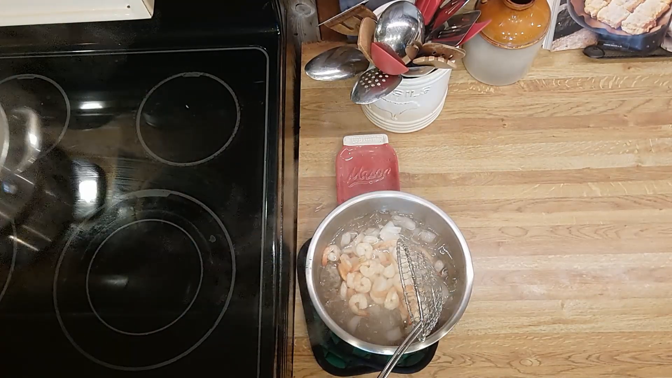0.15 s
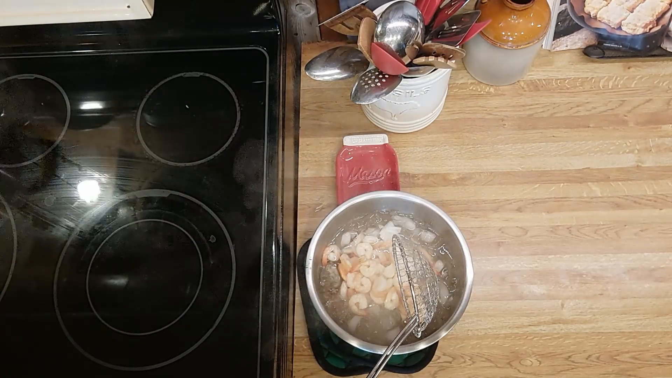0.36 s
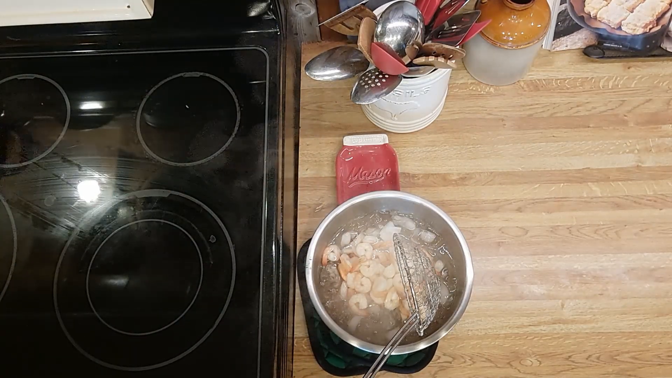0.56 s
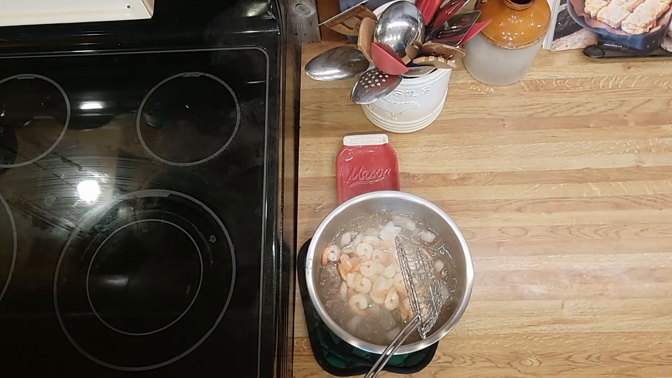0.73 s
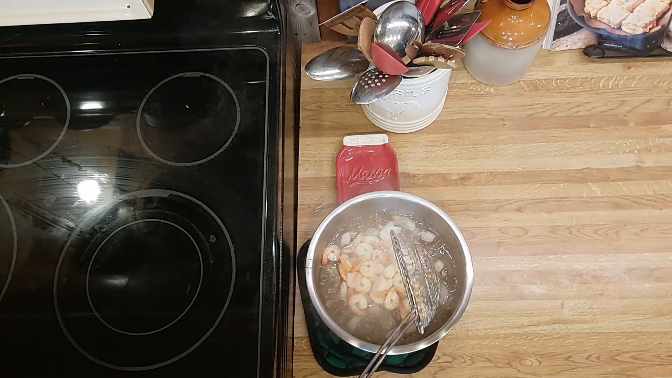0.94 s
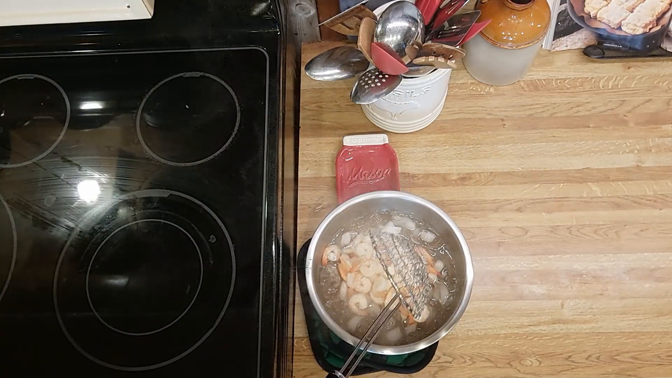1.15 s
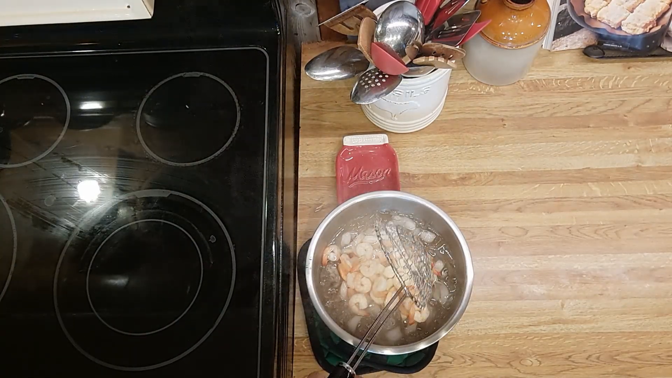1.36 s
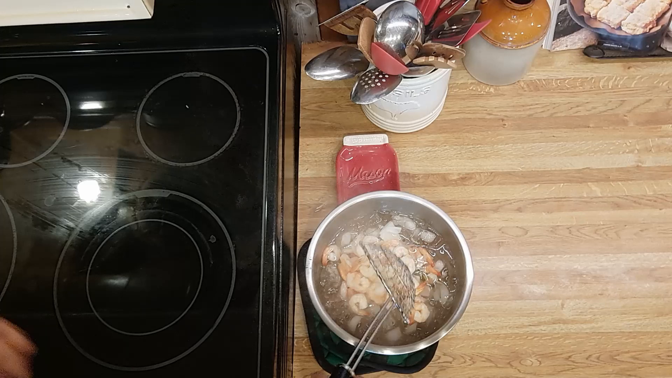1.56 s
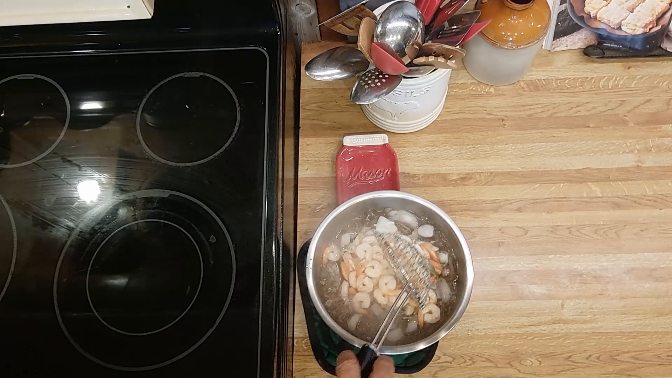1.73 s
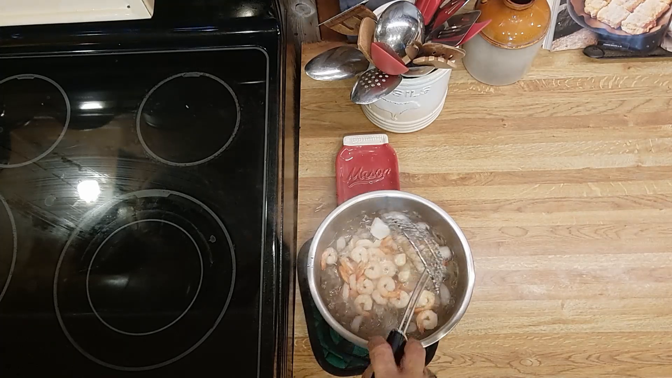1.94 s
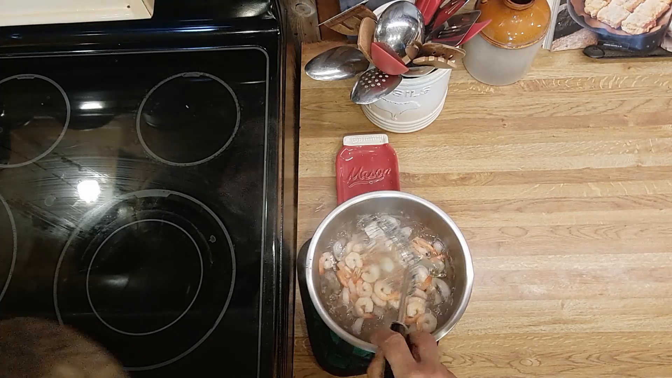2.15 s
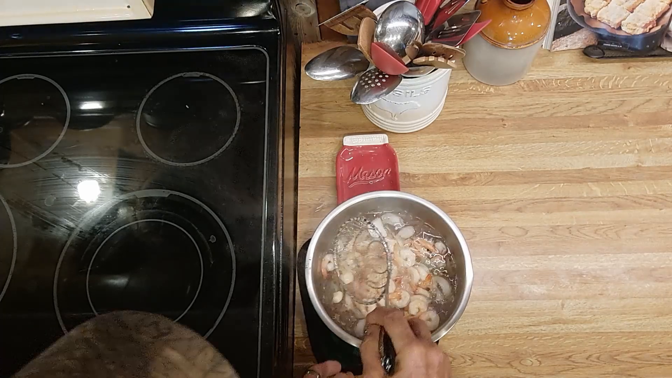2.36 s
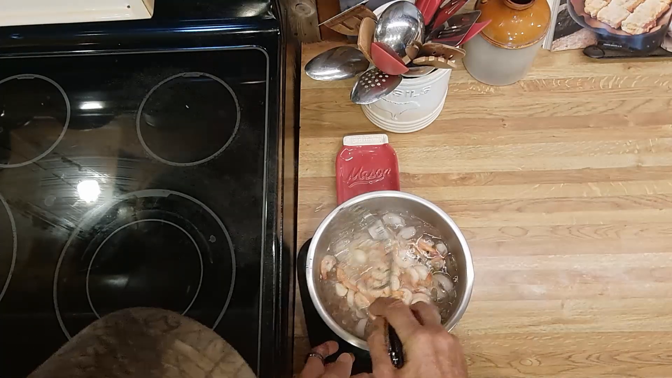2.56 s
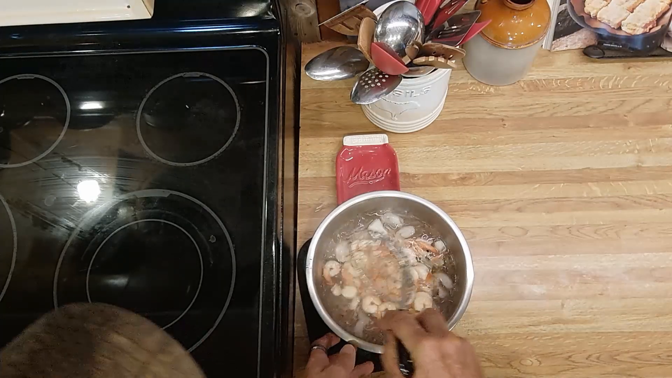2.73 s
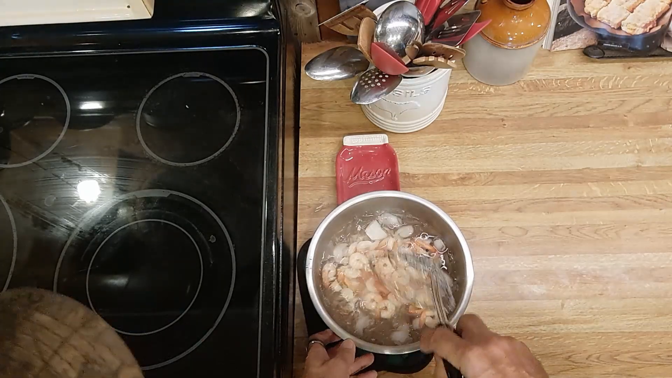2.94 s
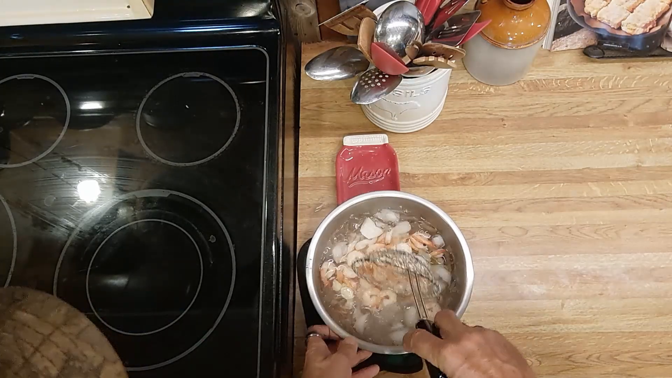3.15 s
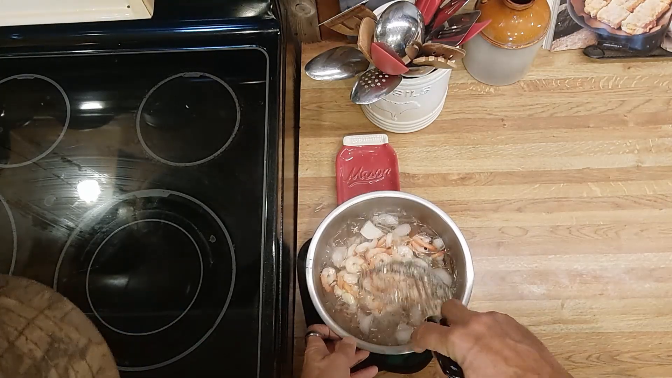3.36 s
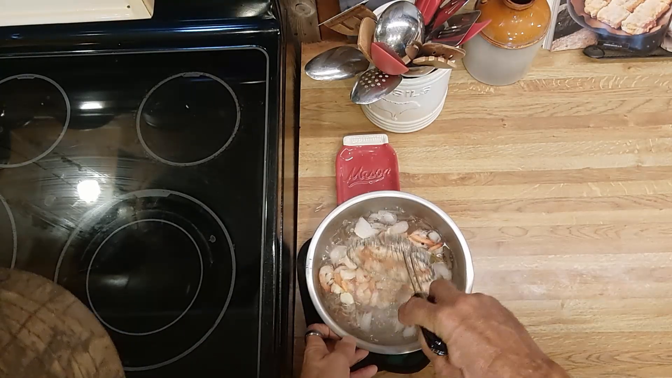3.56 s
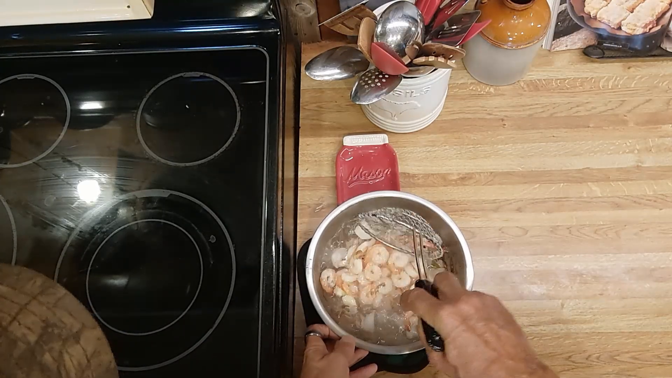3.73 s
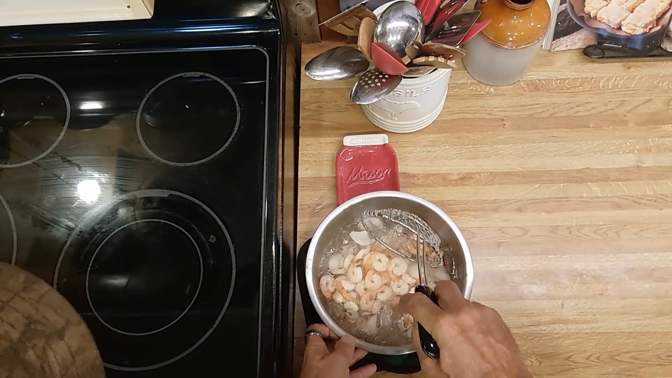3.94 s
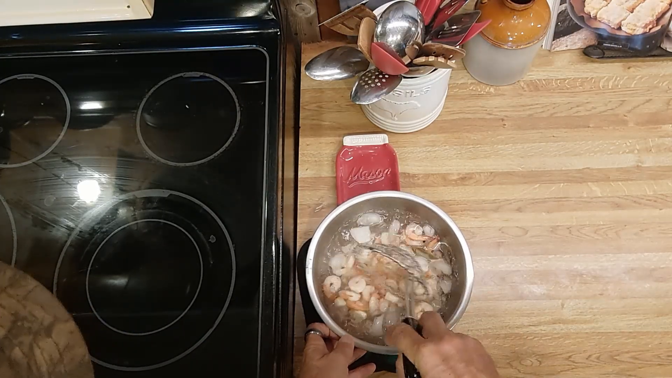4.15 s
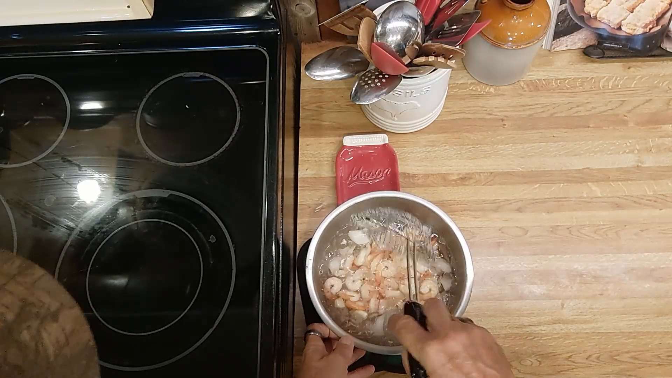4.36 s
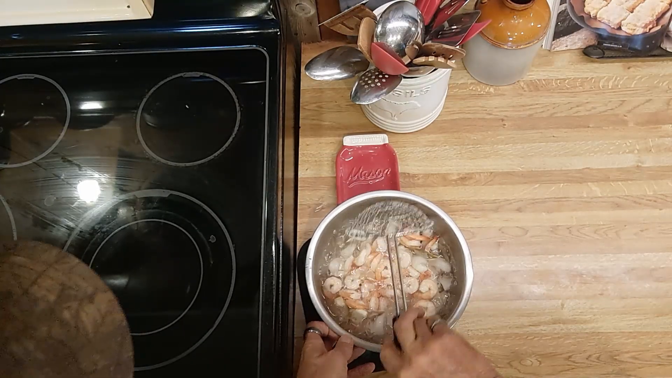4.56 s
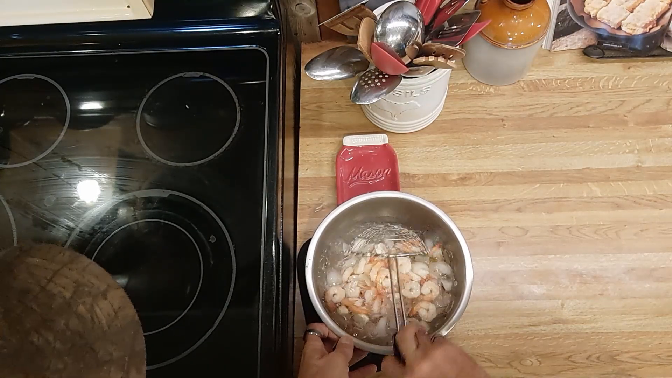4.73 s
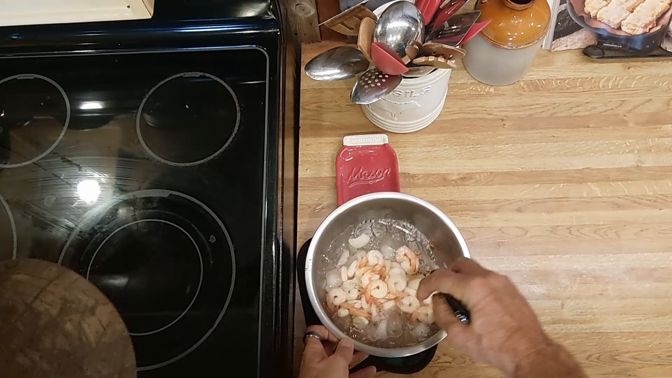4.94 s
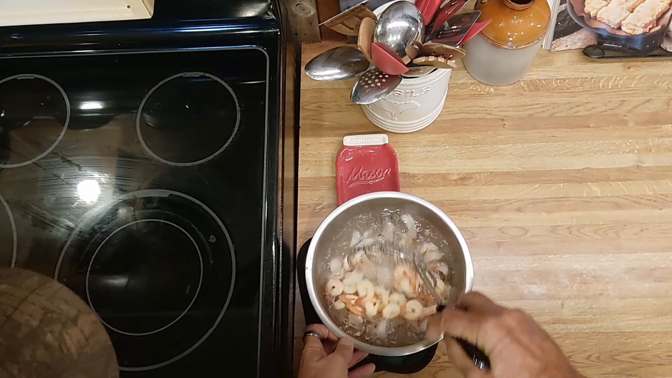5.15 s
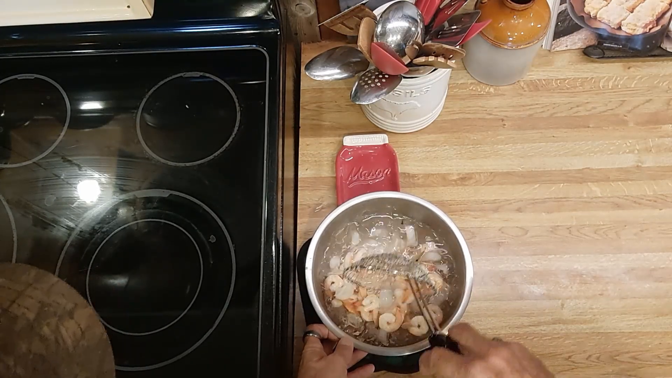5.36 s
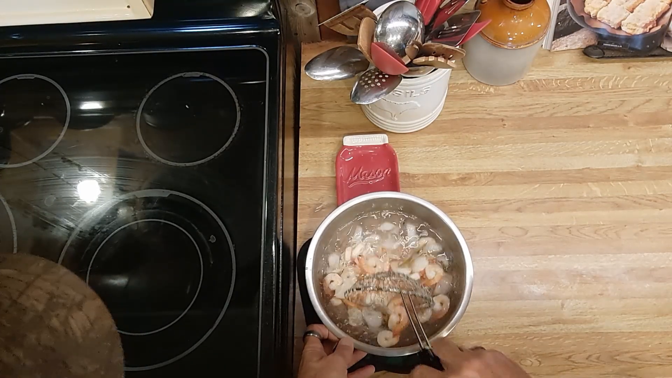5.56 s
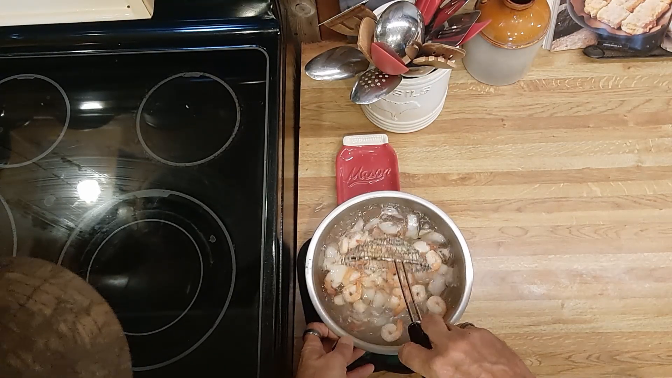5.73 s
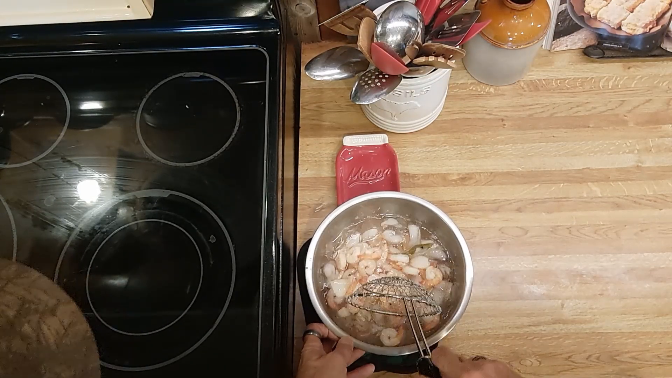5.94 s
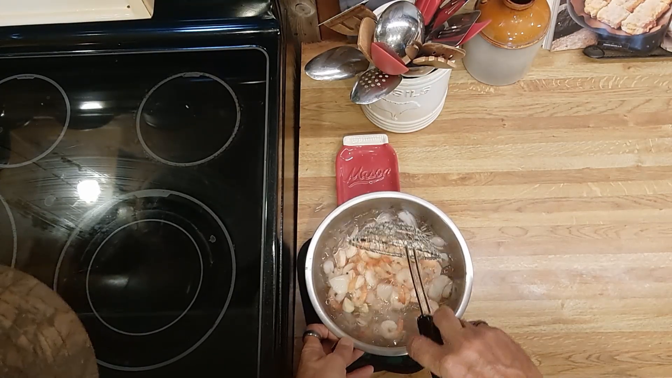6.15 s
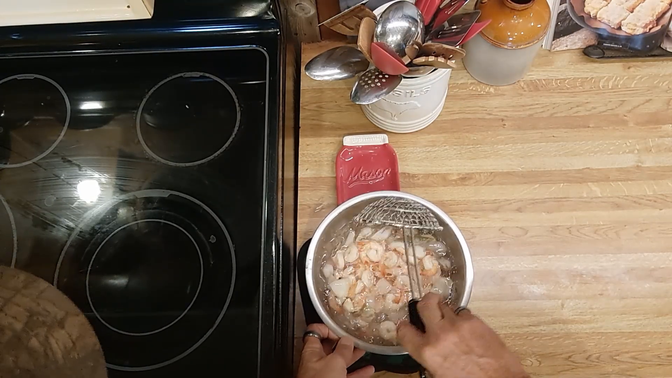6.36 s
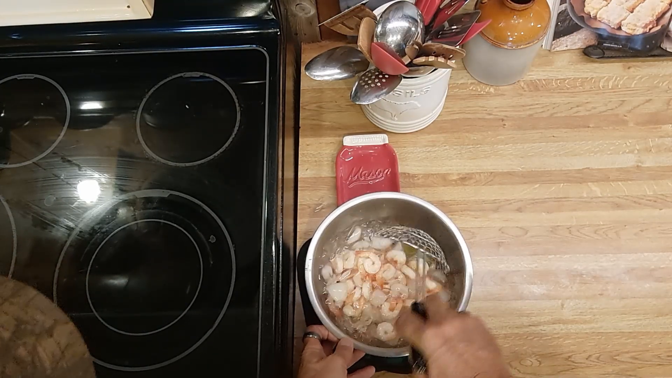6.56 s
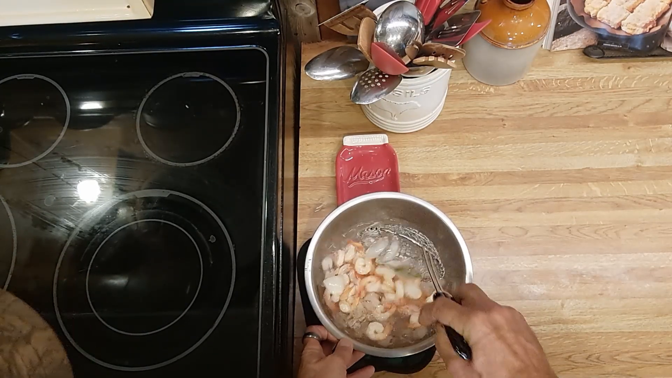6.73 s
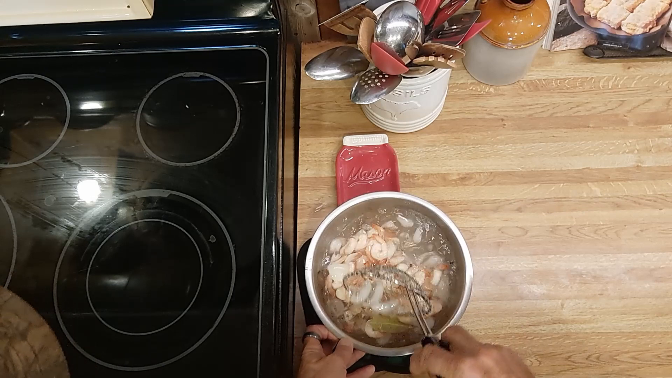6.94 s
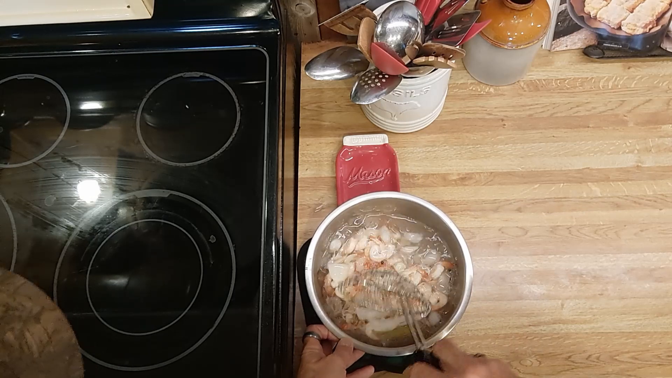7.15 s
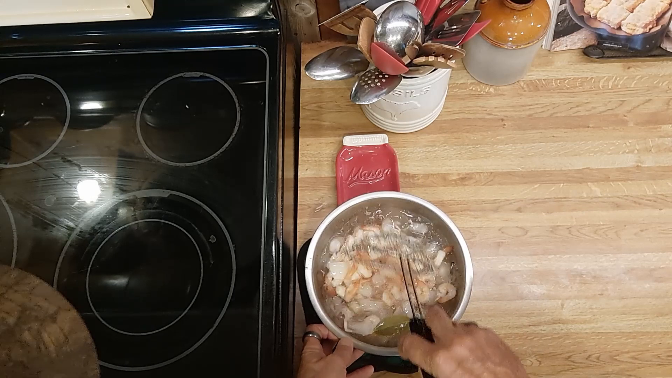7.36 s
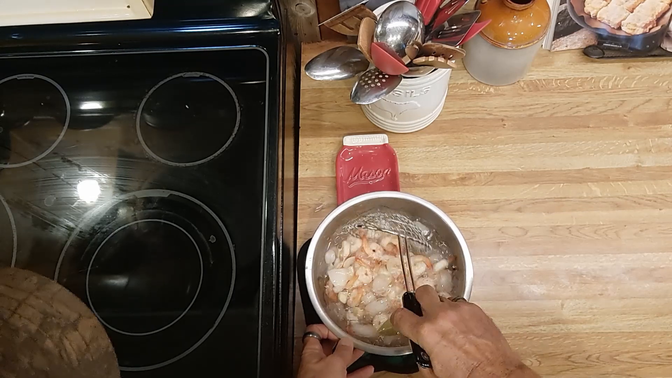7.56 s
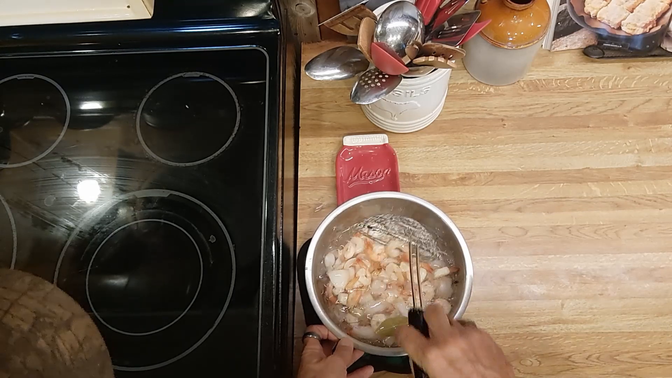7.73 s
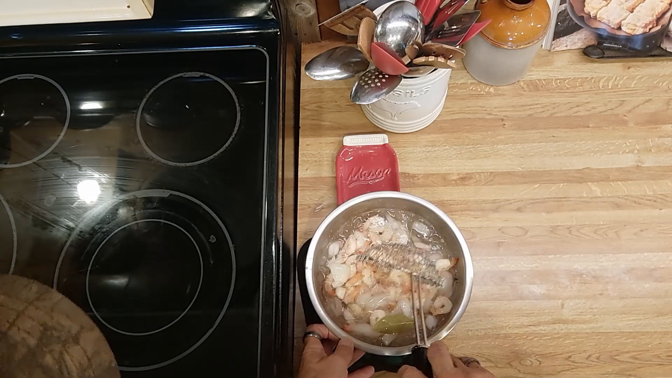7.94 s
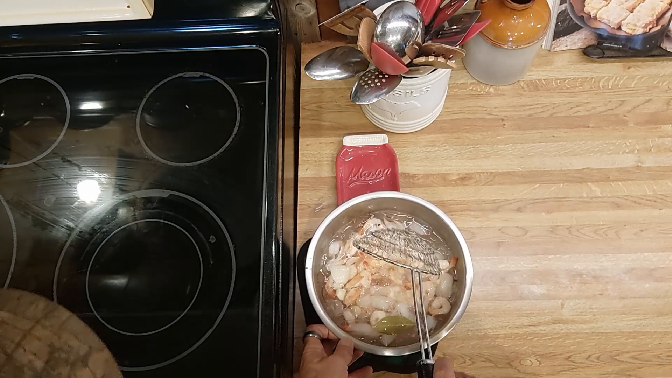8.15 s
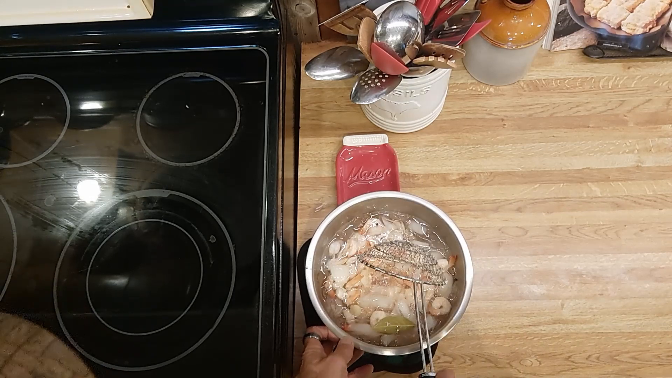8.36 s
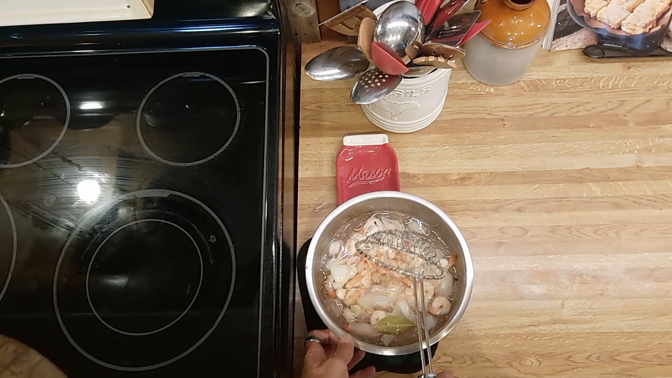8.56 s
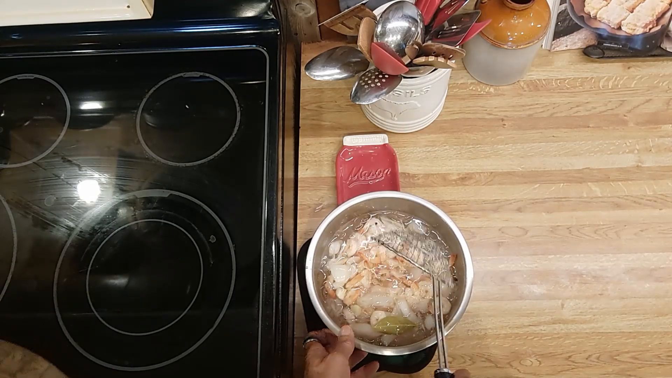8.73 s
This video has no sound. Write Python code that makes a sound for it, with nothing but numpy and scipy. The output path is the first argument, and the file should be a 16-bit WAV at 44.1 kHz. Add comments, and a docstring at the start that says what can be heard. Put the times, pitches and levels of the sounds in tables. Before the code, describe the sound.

A pot judders briefly across a worktop, then a wire strainer stirs ice water in a steel bowl with rattling, clinking cubes and small sloshes.

```python
"""Stirring ice water in a steel bowl

An emptied pot is slid aside, juddering over the worktop: stick-slip friction shaped by the pot's resonances.
Then a wire spider stirs shrimp through ice water in a steel bowl. Ice rattles and clinks as clouds and clusters
of damped notes, water sloshes and plops as noise and rising bubbles, and the spider knocks the bowl's modes.
A small kitchen answers the bowl in stereo, over faint background noise; the pot is heard direct, to the left."""
import sys
import numpy as np
from scipy import signal
from scipy.fft import rfft, irfft, next_fast_len
from scipy.io import wavfile
from scipy.ndimage import map_coordinates

SR = 44100
rng = np.random.default_rng(int(sys.argv[2]) if len(sys.argv) > 2 else 0)


def unload_wav(signal):
    """Save mono or channel-first audio to the path in sys.argv[1] as 16-bit WAV at rate SR, clipped to [-1, 1]."""
    wavfile.write(
        sys.argv[1],
        SR,
        np.round(np.clip(np.atleast_2d(signal).T, -1, 1) * 32767).astype(np.int16),
    )


N = 388080  # 8.8 s

# Levels in the tables are relative: the functions trim each layer in the mix.
# strokes of the spider: [t/s, rise/s, hold/s, ice settling/(dB/s), ice level/dB, slosh level/dB, spray level/dB]
STROKES = [(1.658, .1, 0.11, 134, -46, -60.5, -61), (1.95, 0.051, 0.02, 98, -38, -59.5, -50),
           (2.11, 0.019, 0.018, 132, -46, -59.5, -61.5), (2.372, 0.022, 0.091, 107, -46.5, -66, -55),
           (2.673, 0.0025, 0.042, 112.5, -36.5, -40.5, -51), (3.045, .003, 0.025, 83.5, -35, -40, -48.5),
           (3.466, 0.012, 0.033, 73, -38, -47, -52), (3.835, 0.014, 0.012, 114, -35.5, -46, -50.5),
           (4.11, 0.088, 0.061, 106, -48.5, -61.5, -61), (4.574, 0.0095, 0.023, 150, -57.5, -65, -60),
           (4.612, 0.0081, 0.2, 75, -34.5, -42, -48.5), (4.768, 0.011, 0.0034, 222, -42.5, -34.5, -53.5),
           (4.925, 0.013, 0.34, 70, -42.5, -57, -56), (5.28, 0.034, 0.034, 148, -40, -59, -51.5),
           (5.495, 0.073, .04, 72, -33, -45.5, -47.5), (5.73, 0.03, 0.053, 93, -42.5, -53.5, -56.5),
           (5.94, 0.048, 0.0069, 150, -46, -72, -65), (6.015, 0.0063, 0.0052, 300, -33, -46, -48.5),
           (6.03, 0.042, 0.13, 80.5, -42, -51.5, -58.5), (6.43, 0.016, 0.31, 83.5, -37, -46, -51.5),
           (6.77, 0.053, 0.073, 67, -43.5, -56.5, -59.5), (6.96, 0.12, 0.035, 108, -34, -48, -48),
           (7.243, .015, .04, 79.5, -37.5, -47.5, -55.5), (7.277, 0.0073, .012, 220, -39, -48, -43),
           (7.352, 0.014, .005, 168.5, -31.5, -40.5, -48), (7.416, 0.0064, 0.016, 156, -34.5, -46, -53),
           (7.592, 0.057, 0.011, 122, -33, -52.5, -50), (7.908, 0.019, 0.027, 94, -48, -58.5, -57),
           (8, 0.026, .005, 156, -44.5, -55, -72), (8.14, 0.018, 0.0091, 102, -50, -53, -58),
           (8.45, 0.031, .01, 117, -73, -70, -81)]
# colour of ice rattling on wire and wall: [f/Hz, level/dB]
RATTLE_COLOUR = [(880, -28), (1500, -11.5), (1600, -26), (1810, -10.5), (1930, -19.5), (2060, -10.5),
                 (2350, -9), (3560, -3.5), (4770, -5), (7520, -5.5), (9760, -13), (10500, -19),
                 (13600, -47.5), (22000, -120)]
# colour of folding water: [f/Hz, level/dB]
SLOSH_COLOUR = [(88, -29.5), (150, -17), (210, -26.5), (289, -14.5), (330, -14.5), (507, -25), (691, -5.5),
                (920, -10), (1010, -5.5), (1610, -14.5), (1800, -8), (2600, -5.5), (3380, -35.5),
                (5720, -120)]
# colour of spray off the mesh: [f/Hz, level/dB]
SPRAY_COLOUR = [(6000, -33.5), (9000, 0.5), (11000, -1.5), (13500, 2.5), (16000, -1.5)]
# moving water rocking the bowl on the worktop: [f/Hz, level/dB]
HEAVE_COLOUR = [(30, -30), (55, 3.5), (100, -1), (150, -5), (300, -35.5)]
# resonances of the bowl's wall, damped by the water: [f/Hz, width/Hz, level/dB]
WALL_MODES = [(737, 39, -12.5), (809, 22, 0.5), (2086, 53, -3.5), (2812, 44, -5.5), (2870, 46, 5.5),
              (3265, 27, 3), (3480, 23, 4.5), (3610, 61, -2.5), (4080, 68, 0.5)]
# clearest clinks of ice on wire, wall and other ice: [t/s, level/dB, f/Hz, sparkle level/dB]
CLINKS = [(1.727, -34.5, 3330, -13), (1.975, -25, 7250, -18), (2.0623, -21.5, 7660, -32),
          (2.382, -30.5, 6460, -12), (2.44, -25, 7150, -31), (3.4707, -24.5, 3470, -23.5),
          (3.8237, -41, 5400, -28), (3.8463, -33.5, 3030, -12), (3.8684, -21, 3620, -28),
          (4.0402, -28, 6850, -16), (4.579, -38.5, 7240, -11), (4.6834, -18, 3590, -15.5),
          (4.9532, -27.5, 2290, -29), (4.9879, -28.5, 7200, -16.5), (5.3035, -32.5, 2950, -5.5),
          (5.4979, -31, 4860, -20), (5.5226, -21.5, 3430, -22), (5.559, -17, 6600, -19),
          (5.5794, -20, 3460, -27), (5.6245, -15.5, 2760, -39), (5.6752, -19.5, 3620, -16),
          (5.7687, -25.5, 4000, -10), (6.0186, -9, 7050, -23), (6.0213, -20, 7500, -26.5),
          (6.0681, -25, 4900, -27), (6.1588, -24, 7330, -26.5), (6.4381, -25, 4000, -28),
          (6.6293, -21.5, 3480, -32), (7.0646, -27, 3750, -12), (7.0936, -28.5, 3820, 1.5),
          (7.1287, -26, 5630, -6.5), (7.2575, -18.5, 4460, -28), (7.65, -18, 4170, -35),
          (7.724, -24.5, 3930, -28), (7.863, -34.5, 4700, -36), (8.4472, -45.5, 6060, -11),
          (8.5704, -43.5, 6030, -7)]
# colour of an ice contact: [f/Hz, level/dB]
TICK_COLOUR = [(300, -37), (1500, -26), (2800, -2.5), (5000, -2.5), (7800, 6), (10000, -8.5), (16000, -22)]
# colour of the snap of a hard, dry contact: [f/Hz, level/dB]
SPARKLE_COLOUR = [(3000, -33), (8000, -7), (11000, -4), (16000, -5.5)]
# colour of the water-loaded wall under a clink: [f/Hz, level/dB]
THUD_COLOUR = [(100, -20), (400, -22.5), (720, 8), (850, -1.5), (1100, -0.5), (1700, -2), (4000, -38.5)]
# single large air bubbles: [t/s, starting f/Hz, level/dB]
PLOPS = [(4.622, 1066, -34.5), (4.722, 2290, -34.5), (4.737, 775, -35), (4.787, 692, -25.5),
         (4.788, 990, -35), (4.845, 1500, -35), (5.538, 2360, -34), (6.116, 1820, -37.5),
         (6.124, 2750, -33.5), (6.603, 925, -39.5), (6.722, 1056, -37), (6.737, 1370, -36.5),
         (7.108, 2040, -38), (7.247, 1420, -41), (7.302, 683, -36.5), (7.310, 2600, -33.5),
         (7.582, 2510, -45), (7.822, 1860, -45), (7.910, 735, -49), (7.935, 1470, -40.5),
         (8.189, 2500, -56), (8.492, 2060, -61), (8.507, 2320, -60)]
# the spider knocks the bowl:
# [t/s, crack level/dB, ring level/dB, boost of the low modes/dB, f favoured by the struck spot/Hz, its boost/dB]
KNOCKS = [(2.675, -25, -45, 4, 1047, 5.5), (2.742, -38, -54.5, -7, 2000, 19),
          (3.047, -19, -34.5, 2.5, 1350, -3.5), (3.869, -29, -64.5, 8, 820, 12),
          (4.624, -28, -60, 11, 1040, -1), (4.775, -28.5, -55.5, 5.5, 960, 3),
          (7.364, -26.5, -48, -30, 782, 12)]
# ringing modes of the steel bowl: [f/Hz, level/dB, t60/s]
BOWL_MODES = [(283, 0, .28), (819, 1, .3), (960, -3, .19), (1040, -2, .19), (1140, -3, .19),
              (1254, -2, .38), (1458, 1, .36), (1997, -10, .36), (2040, -2, .33), (2150, -7, .25),
              (2412, -7, .3), (2515, -7, .25), (2751, -6, .33), (2890, -5, .26), (2945, -5, .26),
              (3021, -1, .3), (3458, -3, .26), (3677, 1, .2), (3903, 0, .22), (4753, -7, .18),
              (5040, -5, .22), (7101, -7, .22)]
# colour of wire cracking on steel: [f/Hz, level/dB]
CRACK_COLOUR = [(100, -35.5), (450, -11), (900, -8), (1700, -24.5), (2600, -4), (3700, 6.5), (5500, -5),
                (7300, 4), (9500, -15.5), (16000, -24.5)]
# shoves of the pot: [t/s, rise/s, hold/s, dying away/(dB/s), judder level/dB, scrape level/dB, grit level/dB]
SHOVES = [(0, 0.001, 0.0092, 200, -61, -51, -43), (.042, 0.021, 0.0043, 247, -56, -41.5, -42.5),
          (.155, 0.037, 0.023, 106, -76, -52, -49), (.266, .014, 0.037, 150, -40, -46.5, -54),
          (.31, 0.044, 0.06, 161, -30, -32, -53), (.415, 0.029, 0.046, 138, -28.5, -32, -40.5),
          (.52, 0.011, 0.013, 92, -55, -39.5, -40.5), (.585, 0.045, .04, 94, -46.5, -42, -45.5)]
# the pot's base catches: [t/s, level/dB]
BUMPS = [(0.313, -37.5), (0.348, -37), (0.403, -34.5), (0.451, -31), (0.496, -33.5), (0.605, -33.5),
         (0.867, -53)]
# the worktop booms under the pot: (t/s, rise/s, hold/s, dying away/(dB/s))
BOOM_SWELL = (0.28, 0.29, 0.12, 60)
# resonances of the pot: [f/Hz, width/Hz, level/dB]
POT_MODES = [(317, 11, 6), (383, 49, -19), (470, 51, -9.5), (596, 38, -6), (735, 8.4, 7), (829, 16, -0.5),
             (1100, 98, -3.5), (1830, 28, -23)]
# colour of the base scraping: [f/Hz, level/dB]
SCRAPE_COLOUR = [(140, -49), (230, -11.5), (289, -17), (324, -3.5), (498, -9.5), (701, -10), (844, -6),
                 (974, -10), (1160, -12.5), (1330, -13.5), (2140, -16), (3480, -25.5), (4070, -32),
                 (7000, -34), (9100, -60), (15400, -120)]
# colour of grit under the base: [f/Hz, level/dB]
GRIT_COLOUR = [(1180, -20.5), (2000, -8), (3490, -13.5), (4080, -15.5), (8630, -17.5), (14800, -32.5),
               (16000, -28)]
# colours of the judder's noise, the worktop's boom and a catch: [f/Hz, level/dB]
RUMBLE_COLOUR = [(70, -32), (105, 1.5), (190, 2), (240, -41.0), (400, -62.0)]
BOOM_COLOUR = [(30, -31.5), (55, 7), (90, 8.0), (140, -32.5)]
BUMP_COLOUR = [(70, -23), (140, 5.0), (250, -24), (350, 9), (850, -0.5), (1400, -29), (6000, -36)]
# how long the room rings: [f/Hz, t60/s]
ROOM_T60 = [(150, 0.59), (800, 0.29), (3000, 0.32), (7000, 0.36), (15000, 0.38)]
# how alike left and right are in diffuse sound: [f/Hz, correlation]
LIKENESS = [(100, 0.29), (300, 0.58), (700, 0.26), (1400, -0.027), (3000, 0.18), (15000, -0.36)]
# colour of the quiet kitchen: [f/Hz, level/dB]
FLOOR_COLOUR = [(15, -40), (25, -26), (49, -0.5), (72, 0.5), (92, -8.5), (166, -7), (195, -20.5),
                (229, -13), (301, -12.5), (427, -11), (591, -26.5), (863, -11), (936, -13.5), (1560, -25.5),
                (16000, -43)]

ONSET_DB, SAG_DB_PER_S = 14, 12.5  # a movement starts this far under its peak, and slackens while it is held
FADE_IN = 0.2  # share of the rise in which a movement gets under way
WATER_SETTLES, SPRAY_SETTLES = 1.38, 1.13  # times as fast as the ice
WALL_FLUTTER_DB = 6  # scale of the random level swings that drive the wall
ROCK_DB, ROCK_LAG_S = -17, 0.019  # the sloshing water rocks the bowl a moment later
NOTE_SPREAD, NOTE_SCATTER = .09, 0.022  # reach of a cube's notes about its pitch, and their spread (log ratios)
THUD_DB = -32  # the bowl's wall under each clink
PLOP_T60_S = .03
BOOM_DB, FLOOR_DB = -44, -67.5
POT_LEAD_S = 0.000279  # the pot reaches the left ear this much earlier
TOP_HZ = 16100


def stirring():
    """Ice ticks on wire and wall, the mesh sheds spray, and water folds in clouds of little bubbles."""
    rattle, slosh, spray = movements(STROKES, speeds=(1, WATER_SETTLES, SPRAY_SETTLES))
    chips = crackle(RATTLE_COLOUR, t60=0.0054, spread_db=5.5, count=11000)
    # the mesh drags over the cubes in tiny jerks
    rasp = unit(rush(RATTLE_COLOUR) * amp(2.1 * wobble(220)))
    drive = diffuse(rng.standard_normal((2, N))) * amp(WALL_FLUTTER_DB * wobble(150))
    wall = resonant(drive, WALL_MODES)
    ice = rattle * (amp(-5.0) * chips + amp(-1.5) * rasp + amp(-9.5) * wall)

    droplets = crackle(SPRAY_COLOUR, t60=0.0026, spread_db=0.0, count=6000)
    drops = spray * (amp(-1) * droplets + amp(1.0) * rush(SPRAY_COLOUR))

    bubble_hz = rng.uniform(372, 2743, size=(1800, 1))
    bubble_t60 = 0.021 * np.sqrt(1000 / bubble_hz)  # big bubbles ring longer
    cloud = grains(bubble_hz, bubble_t60, spread_db=1.5, rise=0.14, lag=.00003, size=1000)
    bubbles = coloured(cloud, SLOSH_COLOUR)
    water = slosh * (amp(-3.5) * bubbles + amp(-4) * rush(SLOSH_COLOUR))

    rocking = amp(ROCK_DB) * np.interp(np.arange(N) - ROCK_LAG_S * SR, np.arange(N), slosh)
    heave = rocking * coloured(rng.standard_normal(N), HEAVE_COLOUR) * amp([[-4], [1]])
    return ice + drops + water + heave


def clinks():
    """Each cube gives a tick, a cluster of damped notes, a bright snap and a dull thud in the bowl's wall."""
    out, t = np.zeros((2, N)), np.arange(SR // 12) / SR
    place = np.linspace(-1, 1, 5)[:, None]
    for s, db, hz, sparkle_db in CLINKS:
        tick = amp(-16) * burst(TICK_COLOUR, t, t60=0.048, width=0.27)
        # five notes, crowded towards the cube's pitch
        detune = NOTE_SPREAD * place * np.abs(place) + NOTE_SCATTER * rng.standard_normal(place.shape)
        notes = hz * np.exp(detune)
        t60 = 90 / hz  # ninety cycles of the cube's pitch
        ring = amp(-10.5) * bubble(t, notes, t60, rise=0).sum(axis=0) * (1 - np.exp(-t / 0.00085))
        snap = amp(sparkle_db + 3.0) * burst(SPARKLE_COLOUR, t, t60=0.0098, width=0.31)
        thud = amp(THUD_DB) * burst(THUD_COLOUR, t, t60=0.058, width=0.26)
        add(out, s, amp(db) * (tick + ring + snap + thud))
    return out


def plops():
    """Large air bubbles start softly and rise in pitch near the surface."""
    out, t = np.zeros((2, N)), np.arange(SR // 8) / SR
    for s, hz, db in PLOPS:
        soft_start = 1 - np.exp(-t / 0.0017)
        add(out, s, amp(db + 5) * bubble(t, hz, PLOP_T60_S, rise=0.048) * soft_start)
    return out


def knocks():
    """The spider's rim cracks against the bowl; the spot it strikes decides which modes ring most."""
    out, t = np.zeros((2, N)), np.arange(SR // 2) / SR
    hz, mode_db, t60 = np.transpose(BOWL_MODES)[:, :, None]
    for s, crack_db, ring_db, low_db, spot_hz, boost_db in KNOCKS:
        favour = np.exp(-(np.log(hz / spot_hz) / .15) ** 2)
        scatter_db = rng.standard_normal(hz.shape)
        strength = amp(mode_db + scatter_db + low_db * (hz < 500) + boost_db * favour)
        # each mode starts at its own phase, slightly apart in the two ears
        phase = rng.uniform(0, 2 * np.pi, hz.shape) + .5 * rng.standard_normal((2, len(hz), 1))
        build = 1 - np.exp(-t * hz / 3)  # a mode takes a few cycles to build up
        modes = strength * build * amp(-60 * t / t60) * np.sin(2 * np.pi * hz * t + phase)
        ring = np.sum(modes, axis=1)

        # the wire basket's many partials
        wire_hz = rng.uniform(2200, 8500, size=(30, 1))
        partials = np.sin(2 * np.pi * wire_hz * t + rng.normal(size=(2, 30, 1)))
        wires = np.sum(amp(along(CRACK_COLOUR, wire_hz)) * partials, axis=1)
        crack = burst(CRACK_COLOUR, t, t60=0.055, width=0.82)
        crack = crack + amp(-16.5) * unit(wires) * amp(-60 * t / 0.41)
        add(out, s, amp(crack_db) * crack + amp(ring_db) * ring)
    return out


def pot():
    """The pot's base sticks and slips: a low judder, a ringing scrape, grit, and a boom in the worktop."""
    judder, body, grit_gain = movements(SHOVES, speeds=(1.15, 1, .9))
    # the slip rate wanders around 159 Hz
    phase = 2 * np.pi * np.cumsum(159 * (1 + 0.064 * wobble(68.76))) / SR
    groan = unit(np.sin(phase) * amp(0.88 * wobble(55.1)))
    # friction noise comes once a slip
    slips = unit(amp(1.8 * np.cos(phase) + 1.5 * wobble(70)))
    friction = diffuse(rng.standard_normal((2, N))) + 0.36 * rng.standard_normal(N)
    ring = resonant(friction * slips, POT_MODES)
    grind = unit(rush(SCRAPE_COLOUR) + 0.85 * coloured(rng.standard_normal(N), SCRAPE_COLOUR))
    scrape = body * (amp(-1.0) * slips * grind + amp(-4.5) * ring)
    specks = crackle(GRIT_COLOUR, t60=0.016, spread_db=-8.5, count=6000)
    grit = grit_gain * (amp(-1.5) * rush(GRIT_COLOUR) + amp(-7.5) * specks)
    boom = amp(BOOM_DB) * swell(*BOOM_SWELL) * rush(BOOM_COLOUR) * amp([[-4], [1]])
    sound = judder * (amp(-1.5) * groan + amp(-4.0) * rush(RUMBLE_COLOUR)) + scrape + grit + boom
    t = np.arange(SR // 8) / SR
    for s, db in BUMPS:
        add(sound, s, amp(db) * burst(BUMP_COLOUR, t, t60=0.21, width=0.25))
    # off to one side: earlier and a little louder on the left
    ears = np.array([[1], [-1]])
    return filtered(sound, lambda hz: np.exp(1j * np.pi * hz * POT_LEAD_S * ears)) * amp([[.5], [-.5]])


def kitchen(x):
    """The room's answer: dying diffuse noise as an echo, drawn afresh for each third of a second of sound."""
    out, size = np.zeros((2, N)), SR // 3
    for start in range(0, N, size):
        hz, t, z = signal.stft(rng.standard_normal((2, SR * 2 // 3)), SR, nperseg=256)
        decay = amp(-60 * t / along(ROOM_T60, hz)[:, None])
        tail = diffuse(signal.istft(z * decay, SR, nperseg=256)[1])
        tail = tail * (1 - np.exp(-np.arange(tail.shape[1]) / SR / 0.00043))  # soft start
        piece = x.mean(axis=0)[None, start:start + size]
        add(out, start / SR, signal.fftconvolve(piece, tail / np.linalg.norm(tail[0]), axes=1))
    return out


def quiet_floor():
    """The quiet kitchen: steady, mostly low diffuse noise, stronger on the right."""
    return amp(FLOOR_DB) * rush(FLOOR_COLOUR) * amp([[-2], [2]])


def swell(s, rise, hold, fall_db_per_s):
    """The gain of one movement: it builds up, is held, then dies away."""
    t, rise = np.arange(N) / SR - s, max(rise, .001)
    building = ONSET_DB * np.clip(1 - t / rise, 0, 1)
    sagging = SAG_DB_PER_S * np.clip(t - rise, 0, hold)
    falling = fall_db_per_s * np.maximum(t - rise - hold, 0)
    return amp(-building - sagging - falling) * np.clip(t / (FADE_IN * rise), 0, 1)


def movements(rows, speeds):
    """Gain curves of three layers: overlapping movements add in power, each layer dies at its own speed."""
    power = np.zeros((3, N))
    for s, rise, hold, fall, *layer_db in rows:
        for layer, db, speed in zip(power, layer_db, speeds):
            layer += (amp(db) * swell(s, rise, hold, fall * speed)) ** 2
    return np.sqrt(power)


def crackle(spectrum, t60, spread_db, count):
    """A stereo cloud of tiny contacts with a given colour, their lives scattered around t60."""
    hz = rng.uniform(1520, 15720, size=(count, 1))
    life = t60 * np.exp(.5 * rng.standard_normal(hz.shape))
    return coloured(grains(hz, life, spread_db, rise=0, lag=.00003, size=220), spectrum)


def grains(hz, t60, spread_db, rise, lag, size):
    """A cloud of damped sines, each size samples long, at random times, strengths and left-right delays."""
    start = rng.integers(0, N, hz.shape)
    strength = amp(spread_db * np.minimum(rng.exponential(size=hz.shape), 3)) / np.sqrt(t60)
    offset = lag * rng.standard_normal(hz.shape)
    k = np.arange(size)
    out = []
    for way in (-1, 1):
        t = np.maximum(k / SR - np.maximum(way * offset, 0), 0)  # only the farther ear is delayed
        ear = strength * bubble(t, hz, t60, rise)
        out.append(np.bincount((start + k).ravel(), ear.ravel(), N + size)[:N])
    return np.array(out)


def bubble(t, hz, t60, rise):
    """A damped sine whose pitch climbs by the share rise over its t60."""
    return np.sin(2 * np.pi * hz * t * (1 + rise * t / t60 / 2)) * amp(-60 * t / t60)


def burst(spectrum, t, t60, width):
    """A dying puff of coloured noise; width weighs the part that differs between the ears."""
    mid, side = coloured(rng.standard_normal((2, len(t))), spectrum)
    return unit(np.array([mid + width * side, mid - width * side])) * amp(-60 * t / t60)


def resonant(x, modes):
    """x through a bank of band-pass resonances, at rms 1."""
    def response(f):
        return sum(amp(db) * 1j * f * w / (c * c - f * f + 1j * f * w) for c, w, db in modes)
    return unit(filtered(x, response))


def rush(spectrum):
    """Diffuse stereo noise of a given colour, at rms 1."""
    return coloured(diffuse(rng.standard_normal((2, N))), spectrum)


def diffuse(pair):
    """Two unrelated signals mixed as mid and side, so left and right are as alike as LIKENESS says."""
    def mid_side(hz):
        turn = np.arccos(np.clip(along(LIKENESS, hz), -1, 1)) / 2
        return np.array([np.cos(turn), np.sin(turn)])
    mid, side = filtered(pair, mid_side)
    return np.array([mid + side, mid - side])


def coloured(x, spectrum):
    """x shaped by a colour table, at rms 1."""
    return unit(filtered(x, lambda hz: amp(along(spectrum, hz))))


def filtered(x, response):
    """x times a response of frequency."""
    n = x.shape[-1]
    m = next_fast_len(n + SR // 8)
    return irfft(rfft(x, m) * response(np.fft.rfftfreq(m, 1 / SR)), m)[..., :n]


def wobble(rate):
    """A smooth random curve, rate knots a second."""
    knots = rng.standard_normal(int(N * rate / SR) + 4)
    return map_coordinates(knots, [np.arange(N) * rate / SR])


def along(points, hz):
    """A table of frequencies and values, read on a log frequency axis."""
    f, v = np.transpose(points)
    return np.interp(np.log(hz + 1), np.log(f + 1), v)


def amp(db):
    """Decibels to gain."""
    return 10 ** (np.asarray(db) / 20)


def unit(x):
    """x scaled to rms 1."""
    return x / np.sqrt(np.mean(x ** 2) + 1e-20)


def add(track, s, sound):
    """Mix a sound into the track from s seconds on."""
    span = track[:, round(s * SR):][:, :sound.shape[-1]]
    span += sound[..., :span.shape[-1]]


def scene():
    """The bowl and its room, the pot off to the side, and the quiet kitchen."""
    churn, hits, clangs = stirring(), clinks() + plops(), knocks()
    room = kitchen(amp(-5.0) * churn + amp(-1.0) * hits + amp(-3) * clangs)
    return churn + hits + clangs + room + pot() + quiet_floor()


def record(dry):
    """The recorder keeps nothing above its band limit."""
    return filtered(dry, lambda hz: hz < TOP_HZ)


dry = scene()
out = record(dry)
unload_wav(out)
```